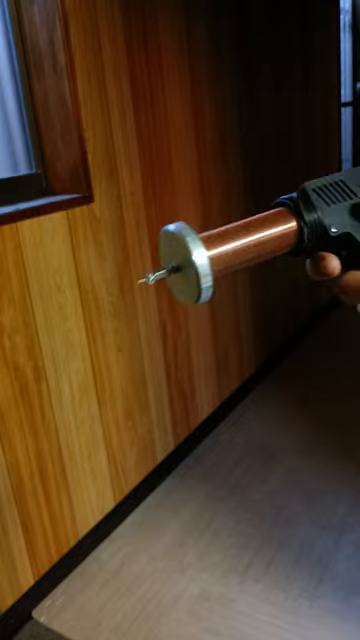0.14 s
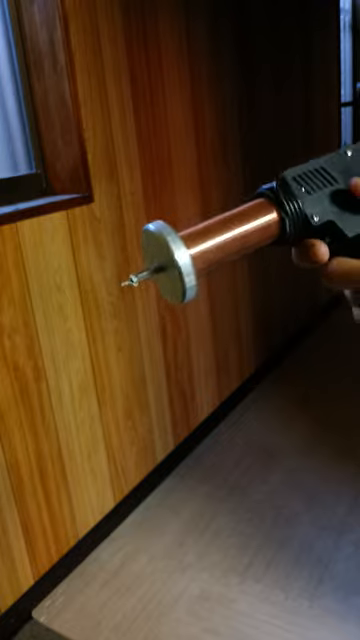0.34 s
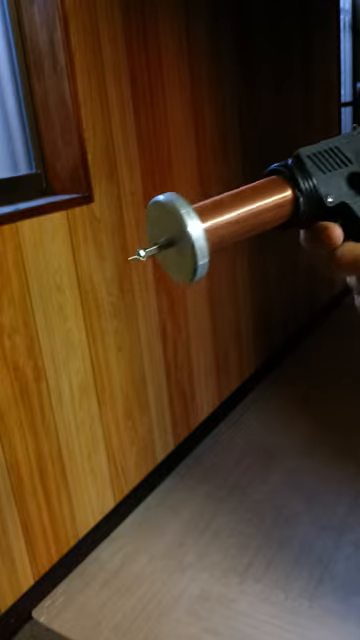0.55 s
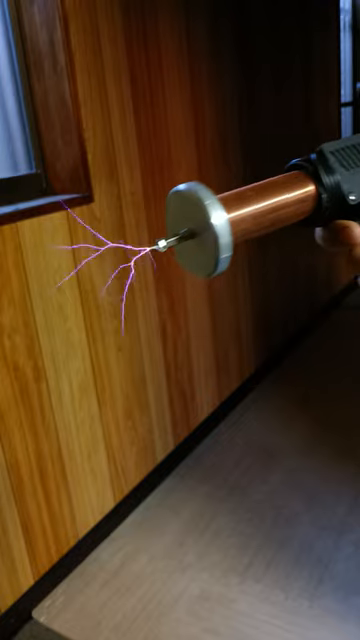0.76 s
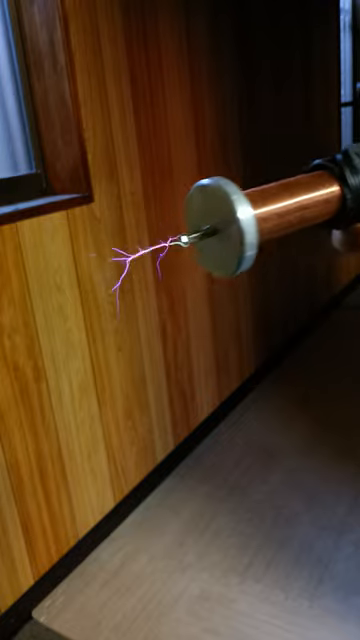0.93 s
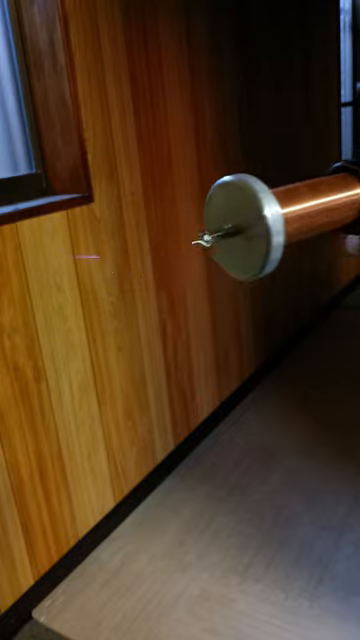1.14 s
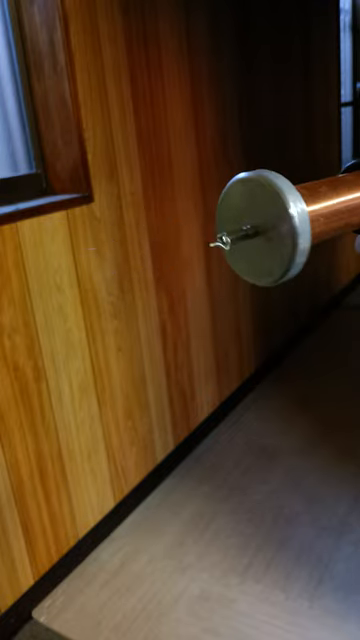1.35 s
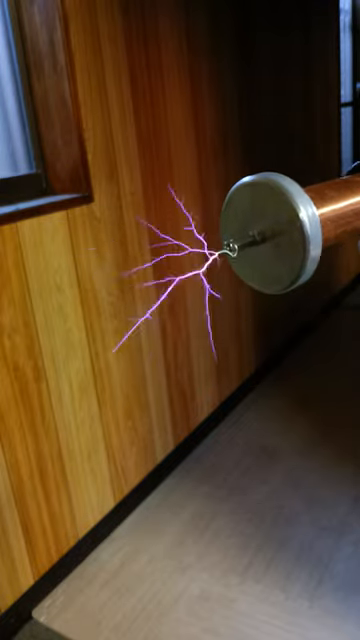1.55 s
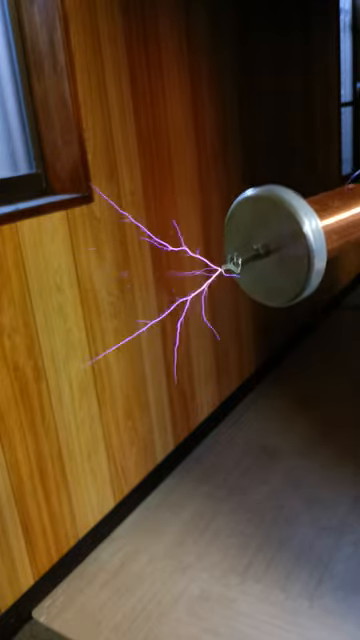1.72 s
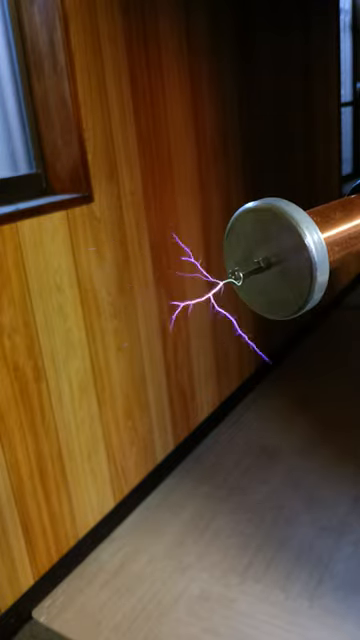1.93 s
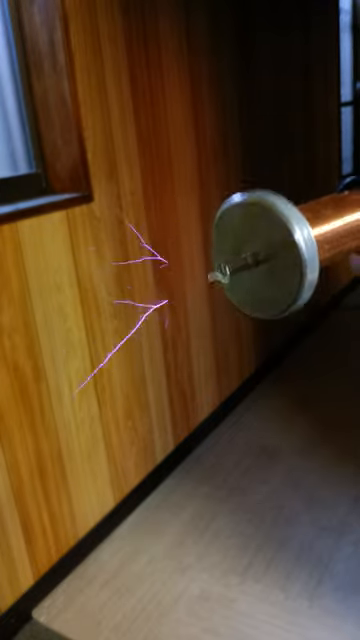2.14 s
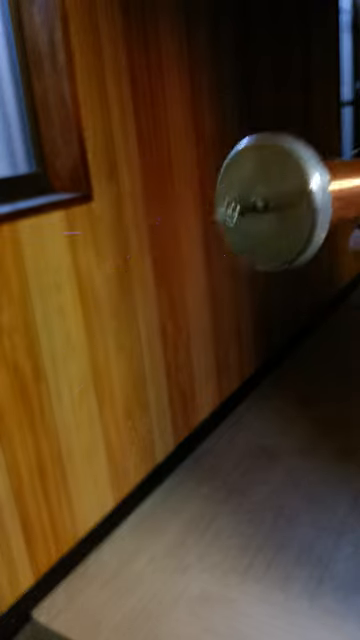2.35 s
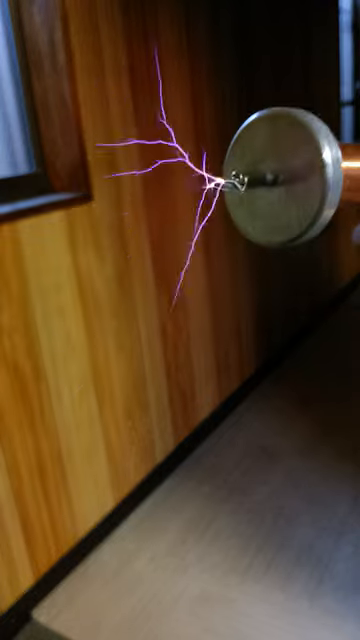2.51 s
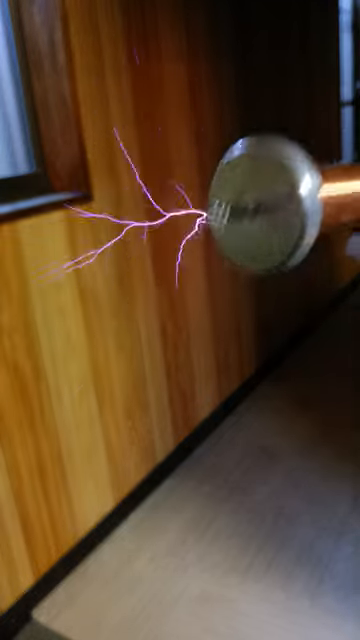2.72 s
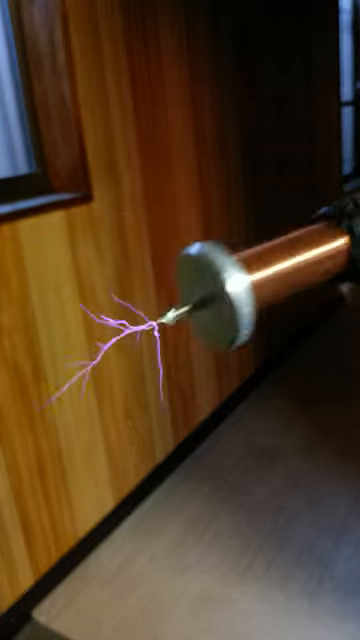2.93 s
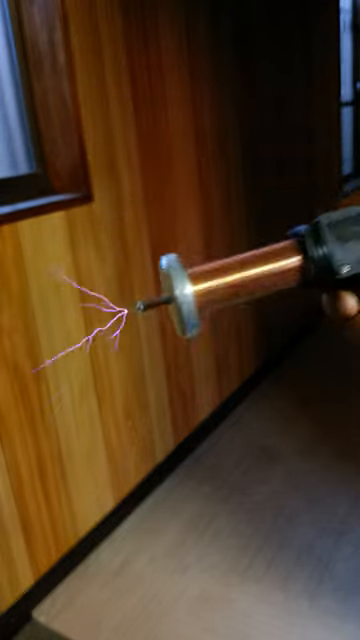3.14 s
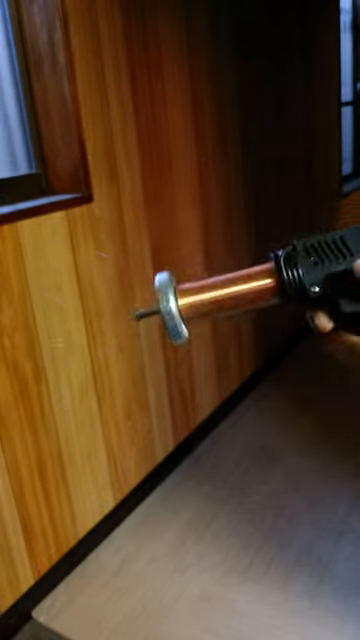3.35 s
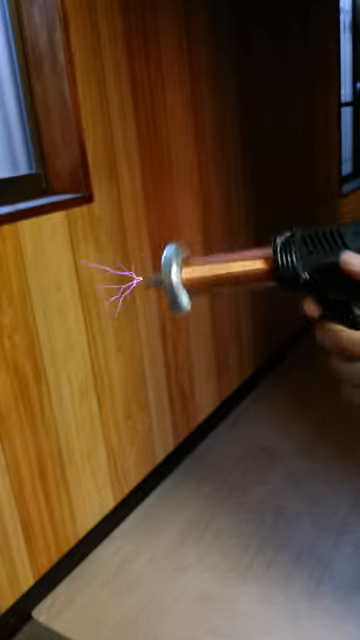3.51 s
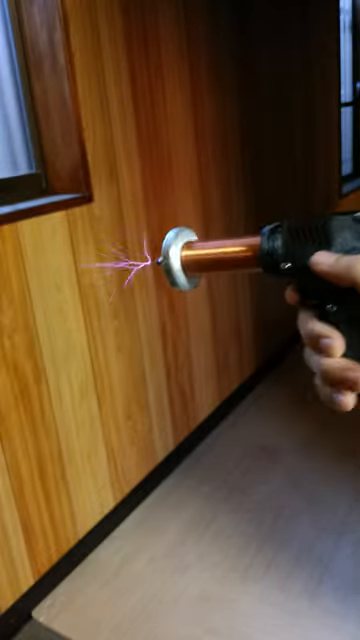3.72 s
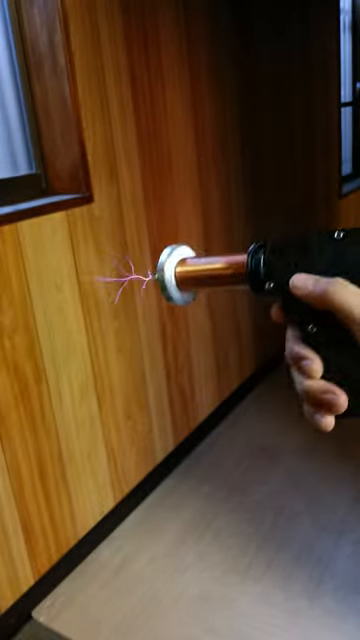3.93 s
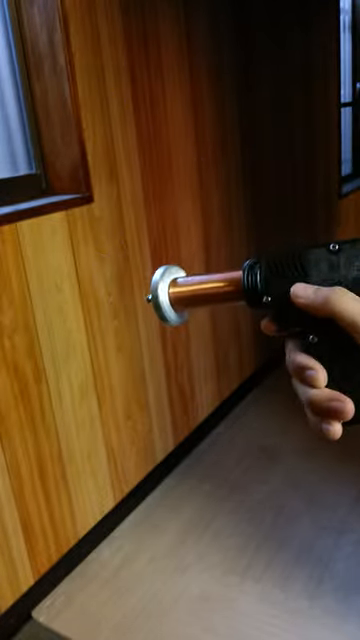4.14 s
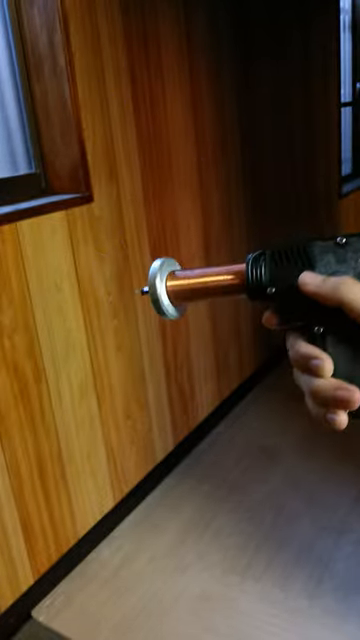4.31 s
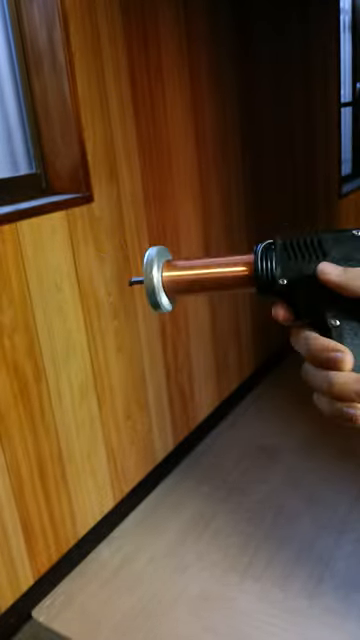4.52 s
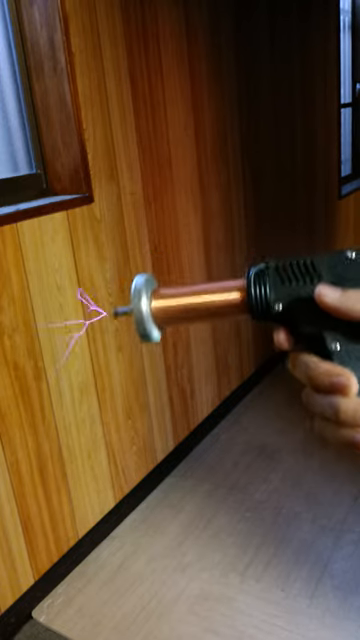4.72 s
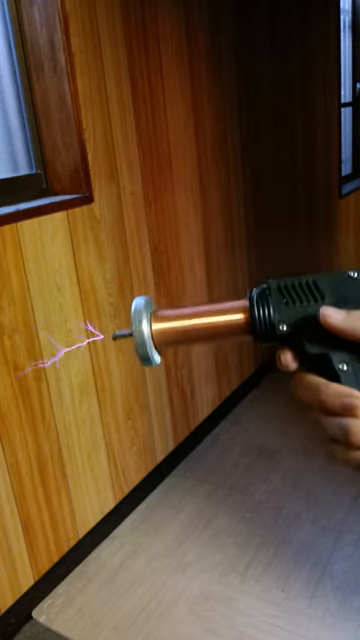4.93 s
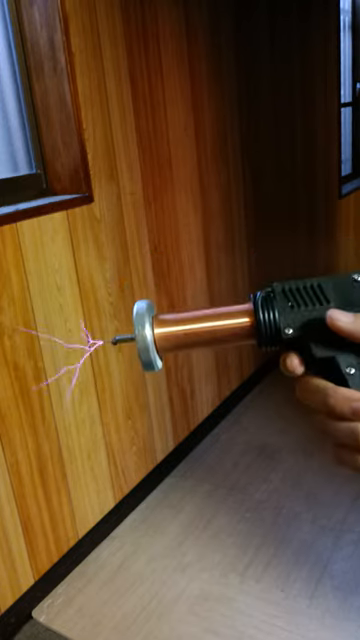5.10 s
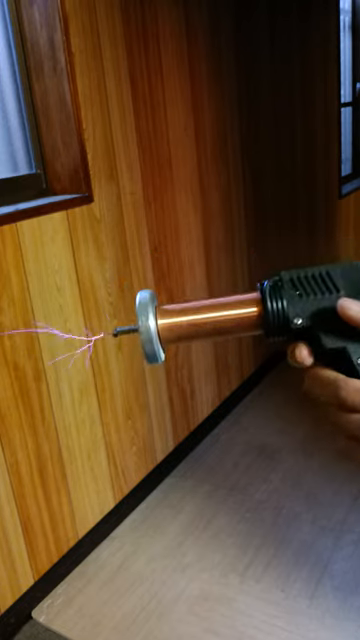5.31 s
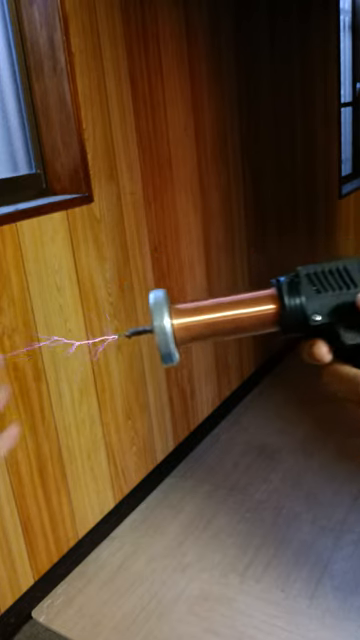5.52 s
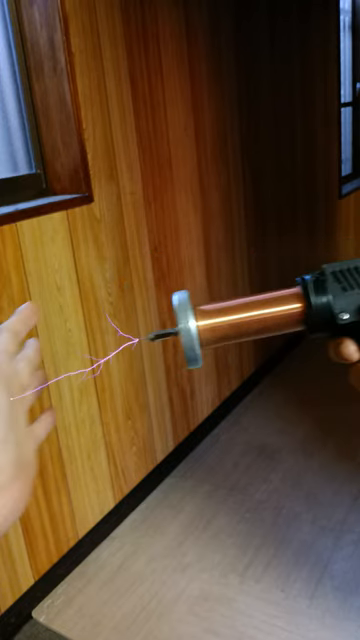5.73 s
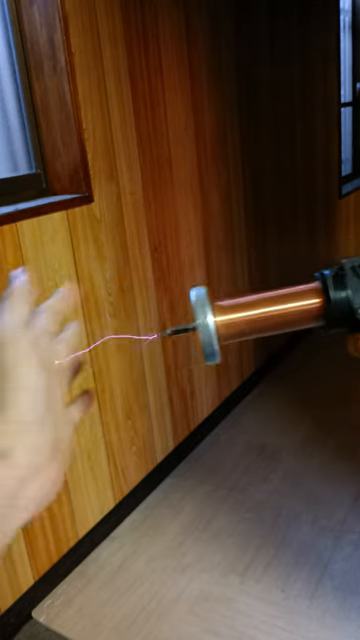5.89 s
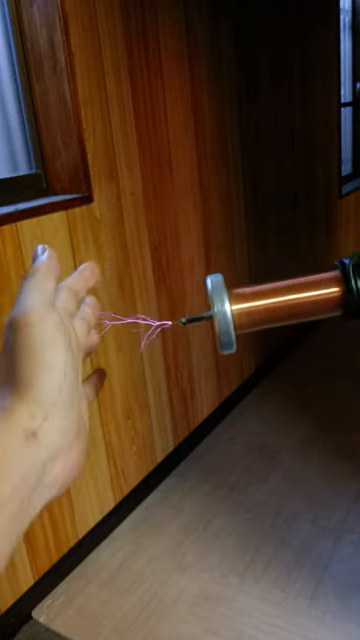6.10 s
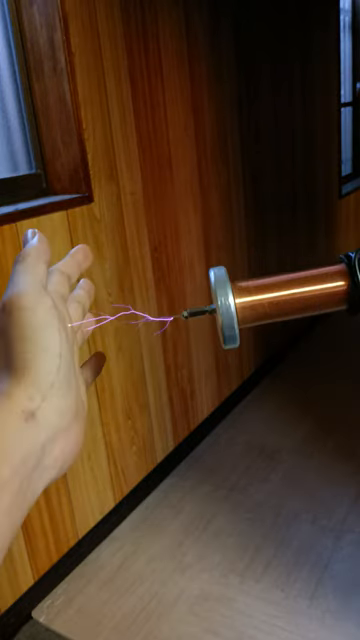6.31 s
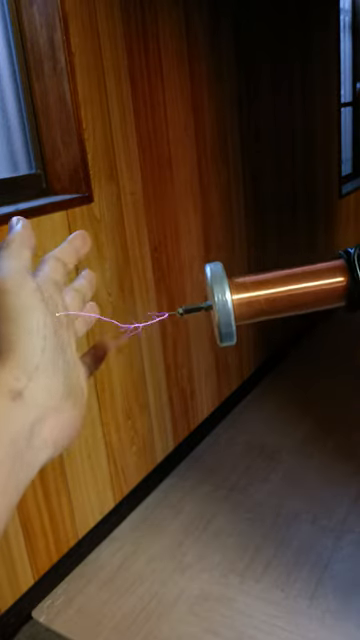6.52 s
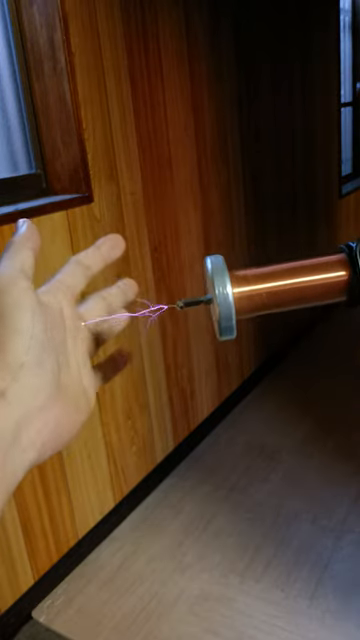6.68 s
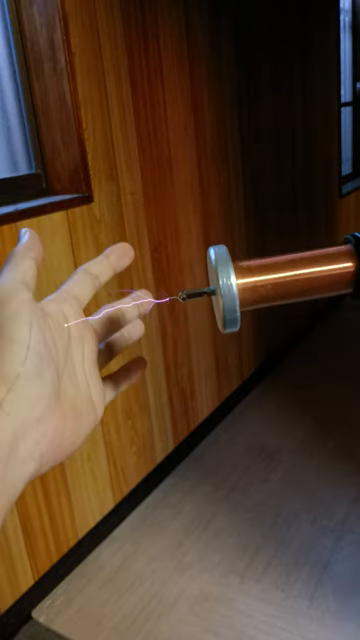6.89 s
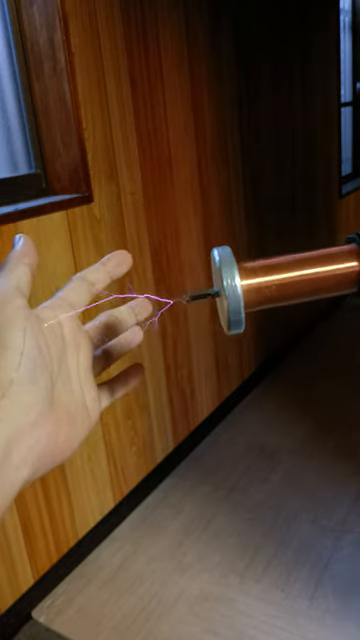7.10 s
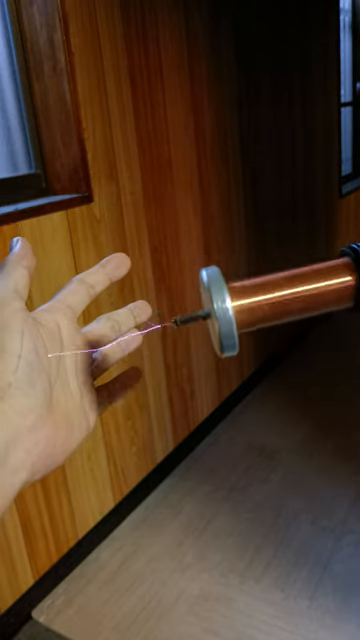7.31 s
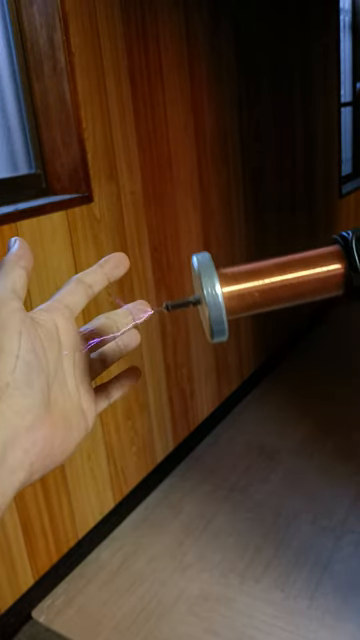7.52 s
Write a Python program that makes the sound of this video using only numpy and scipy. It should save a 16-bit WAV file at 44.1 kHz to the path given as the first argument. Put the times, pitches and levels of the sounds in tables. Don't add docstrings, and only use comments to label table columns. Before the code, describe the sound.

A handheld high-voltage coil snaps out bright, dry electric crackles about twenty a second, pauses briefly, then resumes thinner and quicker onto a hand.

```python
import sys
import numpy as np
from scipy import signal
from scipy.fft import irfft
from scipy.io import wavfile
from scipy.ndimage import uniform_filter1d

SR = 44100
rng = np.random.default_rng(int(sys.argv[2]) if len(sys.argv) > 2 else 0)


def voltage_ratio(level):
    return 10 ** (np.asarray(level, float) / 20)


def output_pcm(signal):
    pcm = np.clip(np.atleast_2d(signal).T, -1, 1) * 32767
    wavfile.write(sys.argv[1], SR, np.round(pcm).astype(np.int16))


N = 332955

# frequency in Hz, density in dB per Hz.
HISS_SPECTRUM = [(20, -39.5), (45, -11.5), (100, -4), (140, -18.5), (200, -4.5), (260, -8), (600, -12.5),
                 (1700, -18.5), (4000, -21), (7300, -20.5), (8800, -35), (13500, -35), (15300, -18.5),
                 (16500, -55.5)]
# time in seconds, level in dB.
HISS_LEVEL = [
    (0, -98.5),
    (.5, -76),
    (4.101, -74),
    (4.502, -73),
    (4.85, -69),
    (7.55, -72.5),
]
# time in seconds, frequency in Hz, level in dB.
HUM = [
    (4.3, 103.6, -110),
    (4.45, 105, -88),
    (4.6, 96, -85),
    (4.68, 93.5, -100),
    (4.781, 98, -82),
    (4.86, 96, -88),
    (4.9, 98, -120),
]

# frequency in Hz, time to fall 60 dB in seconds.
WALL_DECAY = [(200, 0.4), (800, 0.55), (2500, 0.51), (5000, 0.62), (8000, 0.46), (15000, 0.34)]
# frequency in Hz, gain in dB.
WALL_COLOUR = [(100, -15.5), (400, 4.5), (1500, 3.5), (4000, 4.5), (8000, 0.5), (16000, 7)]
TAIL_DB = [-8.5, -3.5]
# frequency in Hz, width in Hz, gain in dB.
ROOM_MODES = [
    (368.4, 30, 5.5),
    (544, 36, -1.5),
]
# time in seconds, gain in dB.
TAIL_GATE = [
    (.17, 3),
    (.215, -12),
    (.26, -20),
    (.45, -22),
    (.51, 0),
]

# time in seconds, right lag in ms, distance (0 near, 1 far), port ring in dB.
AIM = [(0, 0.15, 0.88, 1.5), (0.601, 0.18, 0.58, 1), (1.1, 0.21, 0.59, 1.5), (1.6, 0.21, 0.3, 1.5),
       (2.0, 0.21, 0, 3.5), (2.4, .25, 0.073, -3), (3.0, 0.2, 0.006, 3.5), (3.3, .11, 0.52, 3),
       (3.7, 0.13, 0.55, 3.5), (4.1, .18, 0.28, 12.5), (4.9, 0.11, 1.08, -1), (5.5, .11, 0.63, 4),
       (5.95, .11, 0.47, -5), (6.2, 0.14, 0.51, 2), (6.8, 0.15, 0.44, -3.5), (7.2, .12, 0.32, -1),
       (7.55, .15, 0.36, 2)]
# time in seconds, peak in dB, left minus right in dB.
STRENGTH = [(0, -8, -2), (.6, -7, -2.5), (.87, -8.5, -2.5), (1.25, -7, -1.5), (1.8, -7, 0), (2.5, -8, 0),
            (2.95, -7.5, 2), (3.2, -7.5, -2), (3.5, -11.5, -0.5), (4.03, -18, 6), (4.9, -12, -2),
            (5.2, -12.5, -4.5), (5.42, -15, -5), (5.8, -10.5, 1), (6.1, -9.5, -2.5), (6.6, -9, 1),
            (7.0, -12, 2.5), (7.55, -13, -0.5)]
# time in seconds, share from 0 to 1.
HAND = [
    (5.95, 0),
    (6.05, 0.9),
    (6.4, 1),
    (6.8, 1),
    (7.2, .4),
    (7.55, 0.6),
]
# first spark
# in seconds, sparks until the next run.
SPARK_RUNS = [(0.0192, 1), (0.0656, 1), (0.5149, 1), (0.5677, 1), (0.616, 8), (0.984, 8), (1.3614, 2),
              (1.4576, 1), (1.5072, 2), (1.5995, 3), (1.7412, 1), (1.79, 1), (1.8426, 3), (1.982, 1),
              (2.0315, 6), (2.3137, 8), (2.6919, 2), (2.7883, 4), (2.9743, 8), (3.3573, 4), (3.5442, 2),
              (3.6424, 3), (3.7828, 1), (3.831, 2), (3.933, 2), (4.0281, 1),
              (4.8649, 1), (4.9246, 2), (5.0174, 7), (5.3502, 6), (5.6322, 5), (5.8581, 4), (6.0315, 1),
             (6.0629, 3), (6.1651, 1), (6.2067, 2), (6.2861, 1), (6.3168, 4), (6.4586, 3), (6.5568, 2),
             (6.6304, 2), (6.6971, 4), (6.8381, 6), (7.0356, 1), (7.0673, 2), (7.1364, 2), (7.2177, 1),
             (7.2564, 2), (7.3405, 1), (7.3763, 1), (7.4172, 2), (7.4879, 1), (7.5202, 1)]
# time in seconds, electric thump in dB, left peak in dB, right peak in dB.
STRIKES = [(.5149, -41, -10, -8), (1.0788, -39, -10, -8), (1.8426, -64, -3, -8), (1.9357, -39, -8, -9),
           (1.982, -64, -4, -4), (2.0788, -37, -8, -9), (2.1724, -30, -6, -5), (2.5965, -37, -8, -11),
           (3.0229, -34, -7, -7), (3.0706, -28, -11, -9), (3.2134, -38, -13, -9), (3.2617, -38, -14, -12),
           (3.4034, -38, -13, -12), (4.8649, -35, -16, -15), (5.4443, -29, -16, -7), (5.6322, -30, -11, -8),
           (5.7699, -34, -12, -14), (5.8989, -24, -10, -10), (6.0992, -35, -13, -9), (6.1348, -26, -18, -8),
           (6.3555, -35, -12, -12), (6.4267, -29, -12, -12), (6.4935, -31, -12, -14),
           (6.6662, -35, -13, -12), (6.7294, -24, -12, -10), (6.9381, -30, -16, -15),
           (6.9687, -24, -13, -15), (7.0359, -36, -18, -19), (7.2988, -28, -15, -18),
           (7.4544, -19, -20, -16)]
# time in seconds, electric thump in dB.
JOLTS = [(.891, -44.5), (1.125, -44), (1.173, -44), (1.219, -41), (1.554, -39), (2.361, -44), (2.407, -43),
         (2.504, -45), (2.644, -46), (2.788, -42), (2.928, -42), (5.065, -40), (5.16, -46), (5.304, -48),
         (5.397, -48), (5.858, -48), (6.032, -41), (6.388, -48), (6.524, -51), (6.904, -51), (7.003, -53),
         (7.218, -43)]

BOUNCE_MS = [
    [2.1, 3.2],
    [.82, 1.85, 3.15, 5.8],
]
BOUNCE_SHARES = [
    (0.012, 0.013, .4, 0.033, 0.38, .18),
    (0.06, 0.089, 0.12, 0.067, .48, .45),
    (0.07, .11, 0.5, 0.2, 0.25, 0.085),
]
# time in seconds, resonance in Hz, ring in dB.
HOLLOW = [(.6, 760, -2), (1.5, 833, -12), (3.0, 830, -16), (4.0, 920, -8), (4.9, 905, 8), (5.7, 900, 7),
          (6.0, 910, -4), (6.15, 1410, -8), (7.55, 1370, 4)]

# frequency in Hz, gain in dB.
LEFT_MIC = [(60, -21.5), (115, -0.5), (160, 7.5), (350, 3), (800, 0.5), (1500, 4.5), (4500, 2),
            (7000, -1.5), (9000, -3), (11000, 4), (13500, -8.5), (15500, 11), (16900, -16.5), (17600, -81)]
# frequency in Hz, gain in dB.
RIGHT_MIC = [(60, -2.5), (115, -15.5), (160, 7.5), (380, 4), (800, -1), (2000, 0), (4500, 2), (7400, 4.5),
             (8200, 1.5), (9200, -16), (13000, -2.5), (15500, -3.5), (16900, -3), (17600, -75.5)]
# frequency in Hz, share of the time from 0 to 1.
DROPPED = [(2500, 0), (5100, .03), (5700, .24), (6400, .05), (8000, .06), (8800, .42), (10500, .4),
           (11500, .52), (14200, .55), (15300, .2), (15900, .25), (16200, .88)]


def along(points, t):
    return np.interp(t, *np.transpose(points))


def between(pair, share):
    return pair[0] + np.multiply.outer(share, np.subtract(pair[1], pair[0]))


def read(points, hz):
    f, value = np.transpose(points)
    return np.interp(np.log(hz + 1), np.log(f + 1), value)


def evened(x):
    return x / np.sqrt(np.mean(x ** 2) + 1e-20)


def colour(x, points):
    log_gain = read(points, abs(np.fft.fftfreq(4096, 1 / SR))) * np.log(10) / 20
    taps = np.fft.ifft(np.exp(np.conj(signal.hilbert(log_gain)))).real[:2048]
    return signal.oaconvolve(x, taps)[..., :N]


def ring(x, hz, width):
    r = np.exp(-np.pi * width / SR)
    side = (1 - r * r) / 2
    return signal.lfilter([side, 0, -side], [1, -2 * r * np.cos(2 * np.pi * hz / SR), r * r], x)


def place(sounds, starts):
    track = np.zeros(N + SR)
    for sound, start in zip(sounds, starts):
        track[start:start + len(sound)] += sound
    return track[:N]


def hiss():
    noise = np.array([colour(ear, HISS_SPECTRUM) for ear in rng.standard_normal((2, N))])
    return voltage_ratio(along(HISS_LEVEL, np.arange(N) / SR) - 3.5) * evened(noise)


def distant_hum():
    s, hz, db = np.transpose(HUM)
    t = np.arange(N) / SR
    phase = 2 * np.pi * np.cumsum(np.interp(t, s, hz)) / SR
    return voltage_ratio(np.interp(t, s, db, left=-150)) * (np.sin(phase) + 1.4 * np.sin(2 * phase))


def switch_tick():
    start_s, peak_db = 4.216, -61.5
    tick = rng.standard_normal(200) * np.exp(-np.arange(200) / 25)
    return place([voltage_ratio(peak_db) * np.diff(tick)], [int(start_s * SR)])


def wall_answers():
    near_t60, slap_s, slap_db, slap_t60 = 0.05, 0.027, 6, 0.08
    t = np.arange(SR * 3 // 4) / SR
    lumps_db = 2.8 * rng.standard_normal((3, 2, 256)).repeat(16, axis=2)
    near = rng.standard_normal((3, 2, 4096))
    near *= voltage_ratio(lumps_db)
    near *= voltage_ratio(-60 * t[:4096] / near_t60) * (t[:4096] > 0.0007)

    hz, frame_s, z = signal.stft(rng.standard_normal((3, 2, len(t))), SR, nperseg=256)
    decay = voltage_ratio(-60 * frame_s / read(WALL_DECAY, hz)[:, None])
    far = signal.istft(z * decay, SR, nperseg=256)[1][..., :len(t)]
    slap_fade = voltage_ratio(-60 * np.maximum(t - slap_s, 0) / slap_t60)
    ear_share = np.array([[1.3], [0.8]])
    far *= np.clip(t / 0.0068, 0, 1)
    far *= voltage_ratio(slap_db * ear_share * (t > slap_s) * slap_fade)
    return [v / np.linalg.norm(v, axis=-1, keepdims=True) for v in (near, far)]


def answered(x, answers, turns_hz):
    phase = np.pi * turns_hz * np.arange(N) / SR
    poses = np.cos(phase + np.pi / 3 * np.arange(3)[:, None]) * np.sqrt(2 / 3)
    return signal.fftconvolve((x * poses)[:, None], answers, axes=2).sum(axis=0)[:, :N]


def room(bare, starts, away):
    t = np.arange(N) / SR
    near, far = wall_answers()
    earlier = rng.standard_normal(N) * voltage_ratio(-45 - 60 * t / 0.5)
    echo_db = between((-12, -5), away)
    echoes = answered(place(bare * voltage_ratio(echo_db)[:, None], starts), near, 0.881) * voltage_ratio([[-3], [3]])

    linger = answered(place(bare, starts), far, 1.6) * voltage_ratio(TAIL_DB)[:, None] + earlier
    linger += sum(voltage_ratio(db) * ring(linger, hz, width) for hz, width, db in ROOM_MODES)
    aim_s, _, distance, _ = np.transpose(AIM)
    linger_db = between((-8, 2), np.interp(t, aim_s, distance))
    gate_db = np.interp(t, *np.transpose(TAIL_GATE), left=0)
    both = echoes + linger * voltage_ratio(linger_db + gate_db)
    both = np.array([colour(ear, WALL_COLOUR) for ear in both])
    at, _, side_db = np.transpose(STRENGTH)
    both[0] *= voltage_ratio(-0.4 + 0.96 * np.interp(t, at, side_db))
    return both


def wire_thumps(s, thump_db):
    t = np.arange(2048) / SR
    high_pass = signal.butter(3, 88, "high", fs=SR, output="sos")
    step = signal.sosfilt(high_pass, 1 - np.exp(-t / 0.000093))
    return place(-voltage_ratio(thump_db + 9)[:, None] * step, (s * SR).astype(int))


def spark_table():
    leak_db, leak_spread_db = -67.5, 8
    peak_spread_db, side_spread_db = 1.45, 1.5
    runs = SPARK_RUNS
    nexts = runs[1:] + runs[-1:]
    s = np.concatenate([np.linspace(a[0], b[0], int(a[1]), endpoint=False) for a, b in zip(runs, nexts)])
    at, peak_db, side_db = np.transpose(STRENGTH)
    chance = rng.standard_normal((len(s), 3))
    peak_db = np.interp(s, at, peak_db) + peak_spread_db * chance[:, 0]
    half_db = (np.interp(s, at, side_db) + side_spread_db * chance[:, 1]) / 2
    thump_db = leak_db + leak_spread_db * abs(chance[:, 2])
    table = np.array([s, thump_db, peak_db + half_db, peak_db - half_db])
    jolt_s, jolt_db = np.transpose(JOLTS)
    table[1, abs(s[:, None] - jolt_s).argmin(axis=0)] = jolt_db
    struck = np.transpose(STRIKES)
    table[:, abs(s[:, None] - struck[0]).argmin(axis=0)] = struck
    return table


def hollow_gain(s, hz):
    hollow_s, hollow_hz, ring_db = np.transpose(HOLLOW)
    tune = hz / np.interp(s, hollow_s, hollow_hz)[:, None]
    band = 0.22j * tune / (1 - tune ** 2 + 0.22j * tune)
    return voltage_ratio(np.interp(s, hollow_s, ring_db))[:, None] * band


def cracks(s, scatter_ms, bass_db, lag_ms, bounce_ms, shares, draws, hollow_share=1):
    hz = np.fft.rfftfreq(1024, 1 / SR)
    turn = -2j * np.pi * hz / 1000
    push = np.exp(-(abs(turn) * 0.014) ** 2)

    life_ms = between((0.336, 0.272), along(HAND, s))
    branches = draws[:, :4] - draws[:, :4].mean(axis=1, keepdims=True)
    ends = life_ms[:, None] + scatter_ms[:, None] * branches
    dying = np.exp(turn * ends[:, :, None]).mean(axis=1)
    pull = dying * (0.92 + 0.3 / (1 + turn * 0.34))
    shelf = (1 + (voltage_ratio(bass_db / 2)[:, None] - 1) / (1 - turn * 0.11)) ** 2

    delays = np.array(bounce_ms) + 0.085 * draws[:, 4:4 + len(bounce_ms)]
    bounces = (shares[:, :, None] * np.exp(turn * delays[:, :, None])).sum(axis=1)
    bounced = 1 + bounces / (1 - turn * 0.02)
    hollow = 1 + hollow_share * hollow_gain(s, hz)

    starts = (s * SR).astype(int) - 64
    shift_ms = (s - starts / SR) * 1000 + lag_ms
    spectrum = push * (1 - pull) * shelf * bounced * hollow * np.exp(turn * shift_ms[:, None])
    return irfft(spectrum) / irfft(push)[0], starts


def scene():
    s, thump_db, left_db, right_db = spark_table()
    t = np.arange(N) / SR
    aim_s, lag, distance, ring_db = np.transpose(AIM)
    lag = np.interp(s, aim_s, lag)
    away = np.interp(s, aim_s, distance)
    hand = along(HAND, s)
    scatter = between((0.059, 0.12), hand)
    bass_db = between((-2.5, -20.5), hand) - 2 * away ** 2
    shares = between(BOUNCE_SHARES[:2], away) * (1 - hand[:, None]) + np.outer(hand, BOUNCE_SHARES[2])

    draws = rng.standard_normal((len(s), 8))
    right_draws = 0.86 * draws + 0.38 * draws[:, ::-1]
    left, starts = cracks(s, scatter, bass_db, 0 * lag, BOUNCE_MS[0], shares[:, :2], draws)
    right, _ = cracks(s, scatter, bass_db, lag, BOUNCE_MS[1], shares[:, 2:], right_draws)
    bare, _ = cracks(s, scatter, bass_db, lag, [], shares[:, :0], draws[:, ::-1], hollow_share=0.48)
    bare *= voltage_ratio(-1.44 + 0.44 * (left_db + right_db))[:, None]

    room_left, room_right = room(bare, starts, away)
    front = place(left * voltage_ratio(left_db + 1.24)[:, None], starts) + room_left
    back = place(right * voltage_ratio(right_db - 1)[:, None], starts) + room_right
    back += voltage_ratio(9 + np.interp(t, aim_s, ring_db)) * ring(back, hz=7400, width=600)
    ears = np.array([colour(front, LEFT_MIC), colour(back, RIGHT_MIC)])
    thumps = voltage_ratio([[-33], [0]]) * wire_thumps(s, thump_db)
    return ears + thumps + hiss() + distant_hum() + switch_tick()


def handset_frames(x):
    smear_db, chance_db = -13, 7
    hz, t, z = signal.stft(x, SR, nperseg=384, noverlap=256)
    rounding = rng.standard_normal(z.shape) + 1j * rng.standard_normal(z.shape)
    z = z + voltage_ratio(smear_db) * abs(z) * rounding

    band = np.arange(len(hz)) // 6
    power = np.add.reduceat(abs(z) ** 2, np.arange(0, len(hz), 6), axis=1)
    level_db = 10 * np.log10(power + 1e-20)
    chance = rng.standard_normal((len(t) // 4 + 1, 2, band[-1] + 1)).repeat(4, axis=0)[:len(t)]
    chance = 0.7 * (chance + chance[:, :1, ::-1])
    worth = level_db - uniform_filter1d(level_db, 40, axis=2) + chance_db * np.moveaxis(chance, 0, 2)
    rank = worth.argsort(axis=2).argsort(axis=2)[:, band] / len(t)
    kept = rank >= read(DROPPED, hz)[:, None]
    return signal.istft(z * kept, SR, nperseg=384, noverlap=256)[1][:, :N]


def roll_off(x):
    return signal.sosfilt(signal.butter(12, 17310, fs=SR, output="sos"), x)


def record(dry):
    mix = handset_frames(dry)
    return roll_off(mix)


dry = scene()
out = record(dry)
output_pcm(out)
```